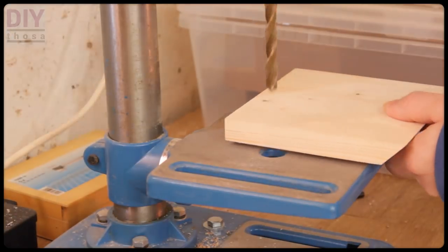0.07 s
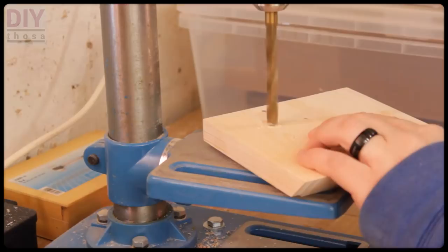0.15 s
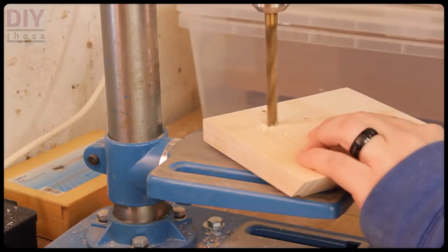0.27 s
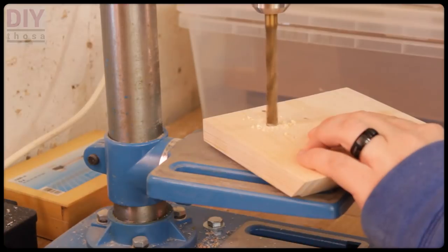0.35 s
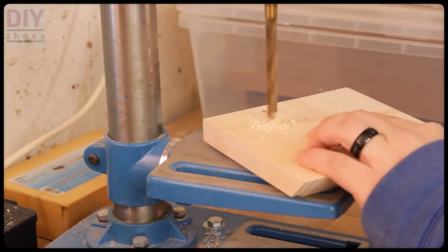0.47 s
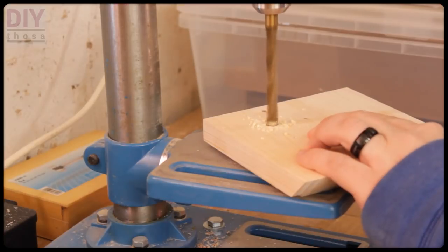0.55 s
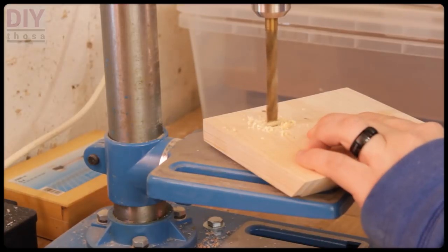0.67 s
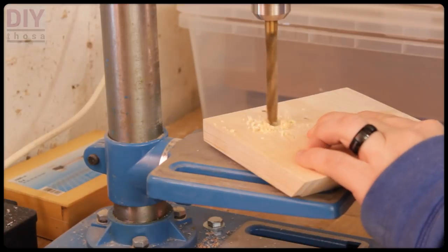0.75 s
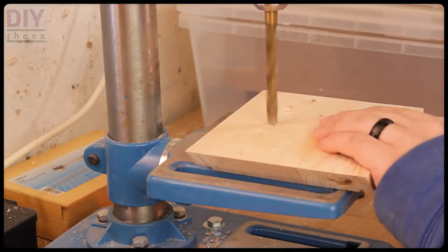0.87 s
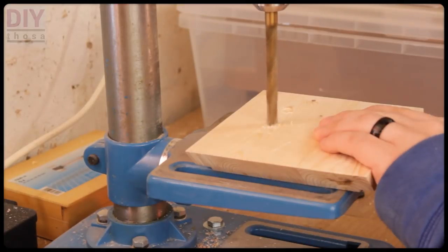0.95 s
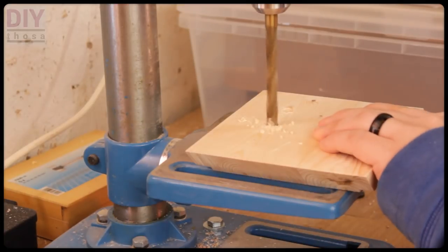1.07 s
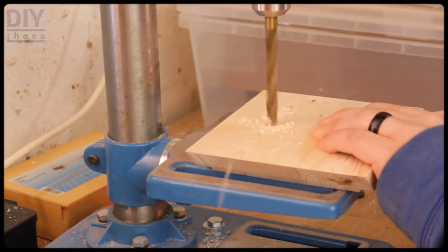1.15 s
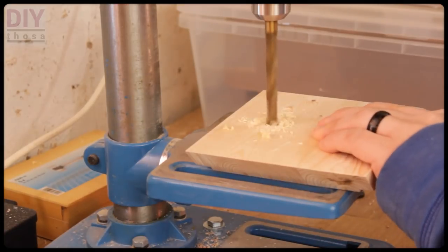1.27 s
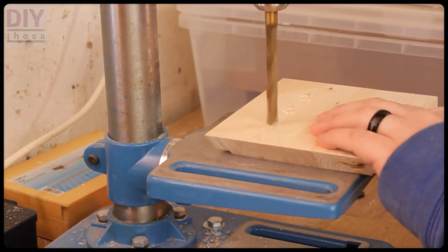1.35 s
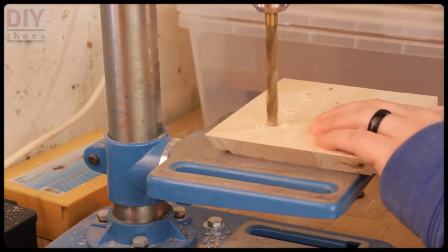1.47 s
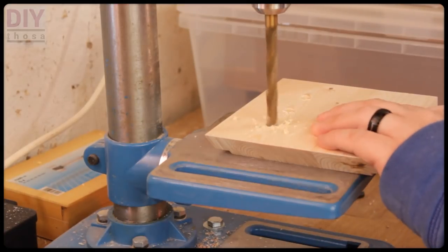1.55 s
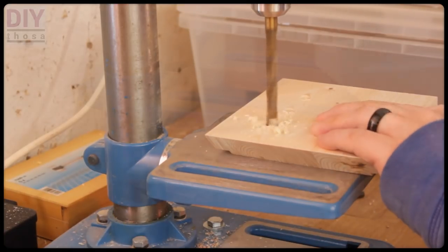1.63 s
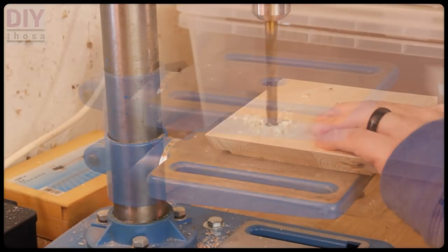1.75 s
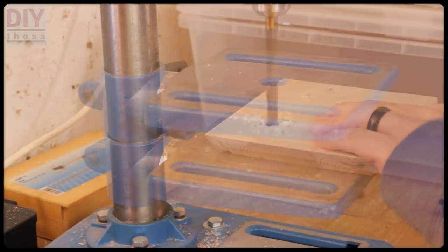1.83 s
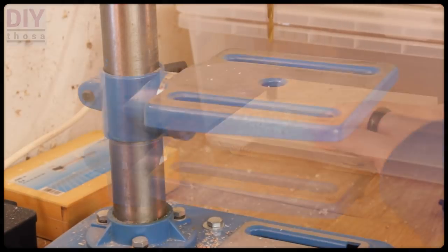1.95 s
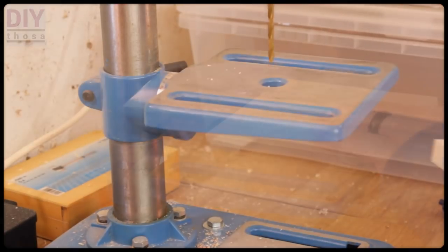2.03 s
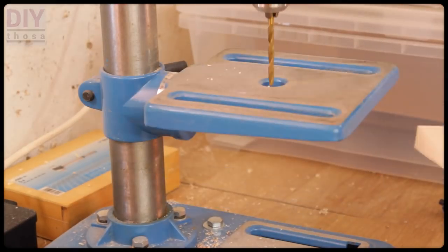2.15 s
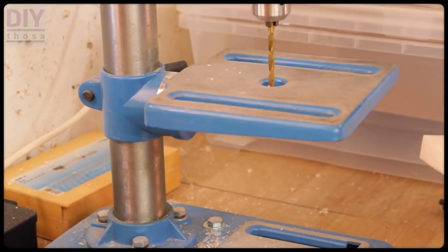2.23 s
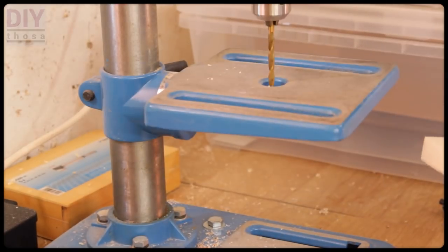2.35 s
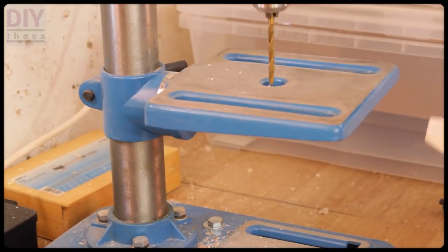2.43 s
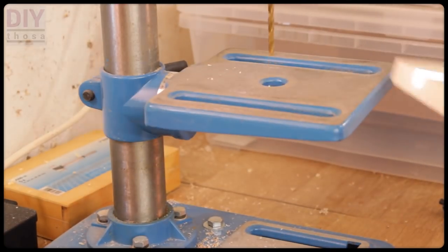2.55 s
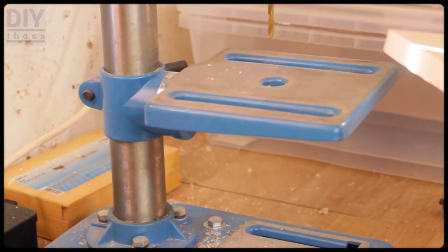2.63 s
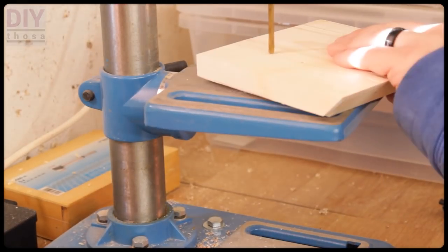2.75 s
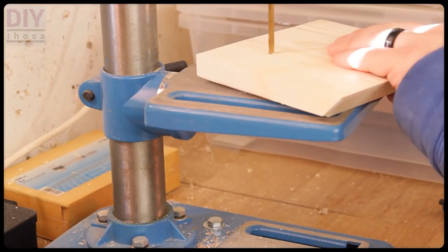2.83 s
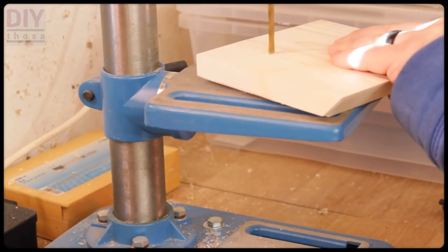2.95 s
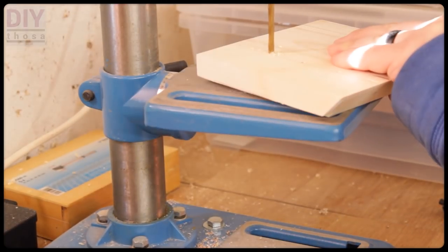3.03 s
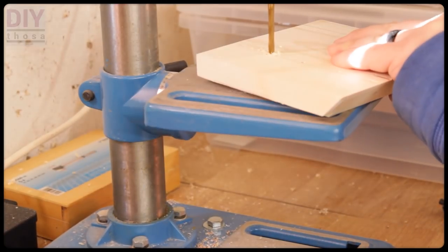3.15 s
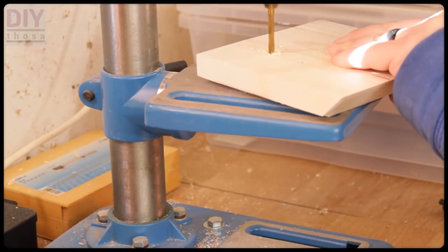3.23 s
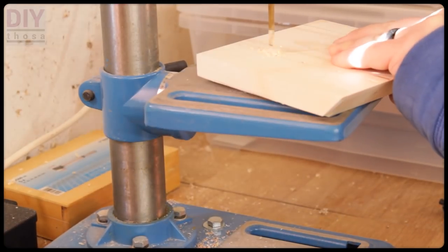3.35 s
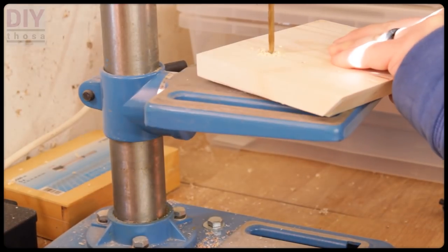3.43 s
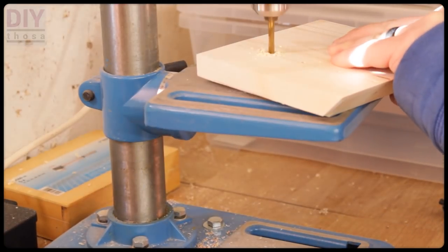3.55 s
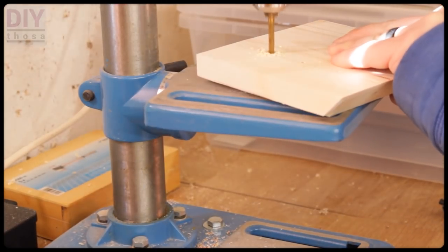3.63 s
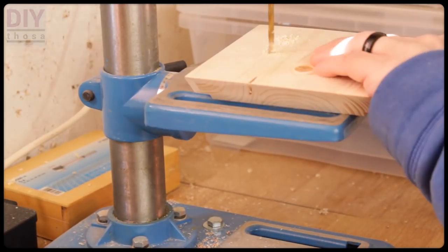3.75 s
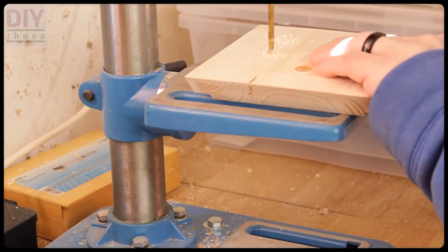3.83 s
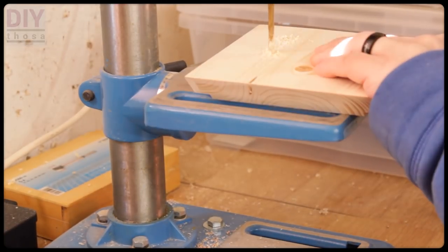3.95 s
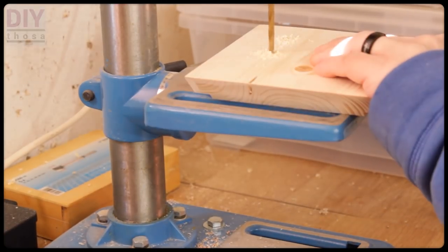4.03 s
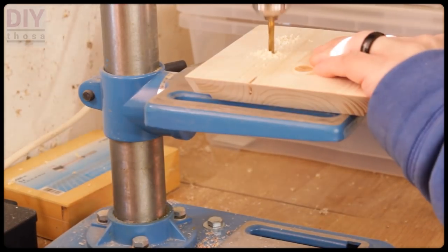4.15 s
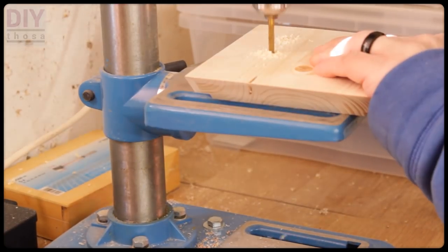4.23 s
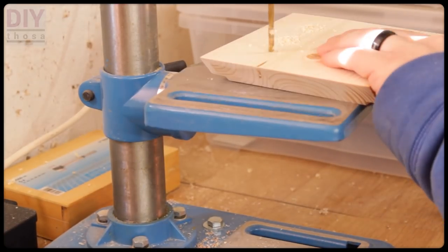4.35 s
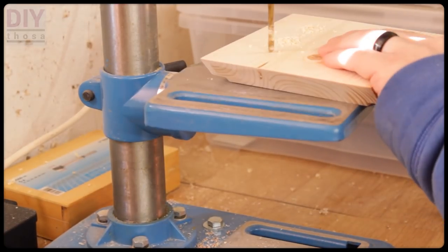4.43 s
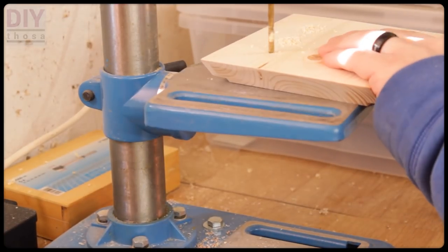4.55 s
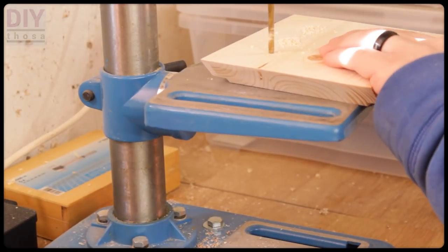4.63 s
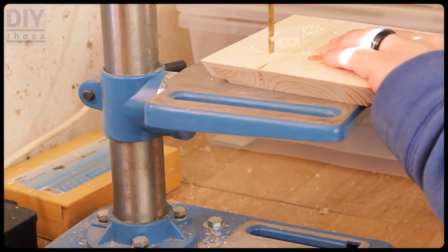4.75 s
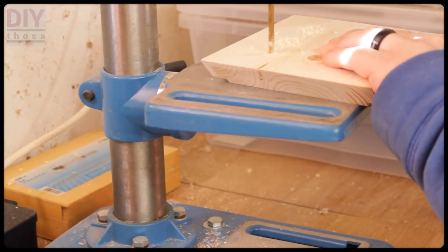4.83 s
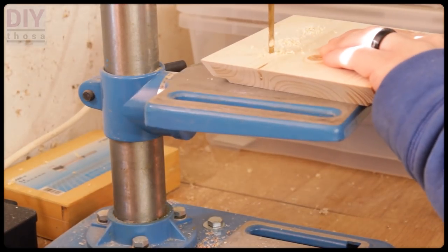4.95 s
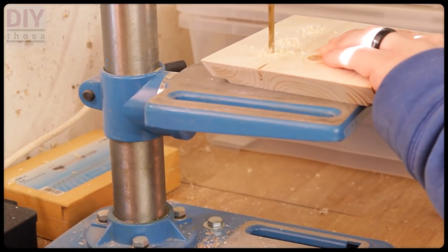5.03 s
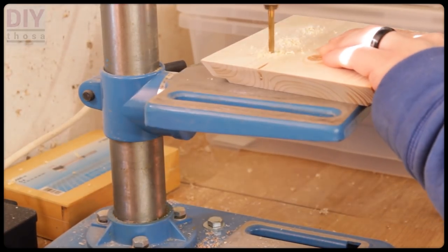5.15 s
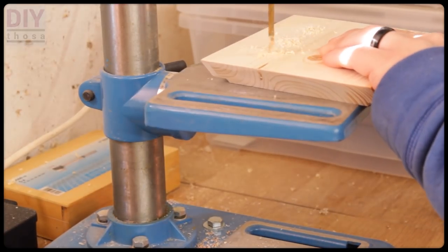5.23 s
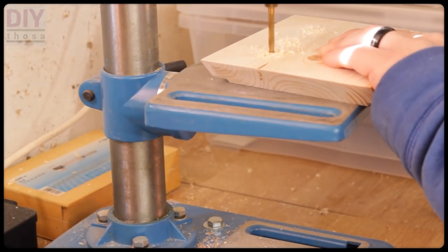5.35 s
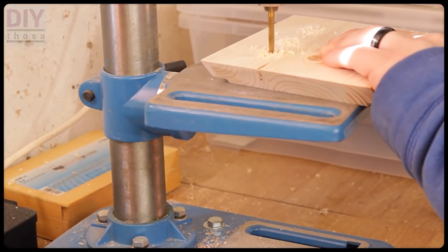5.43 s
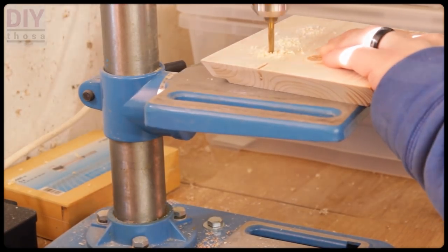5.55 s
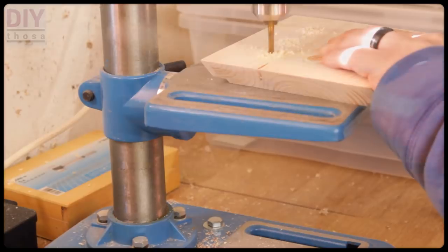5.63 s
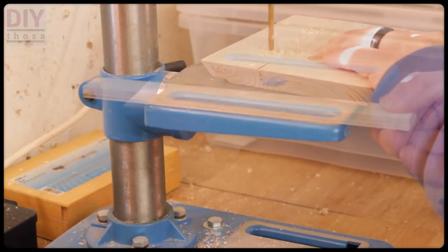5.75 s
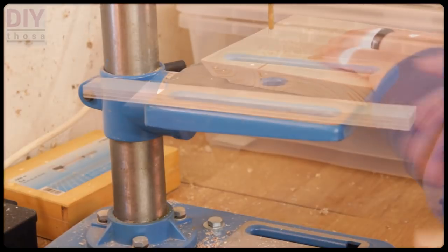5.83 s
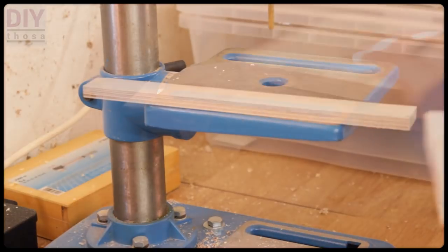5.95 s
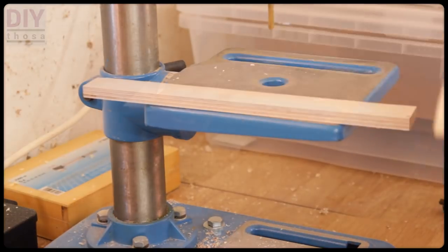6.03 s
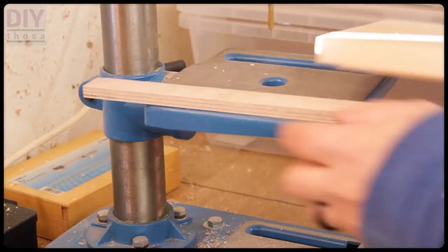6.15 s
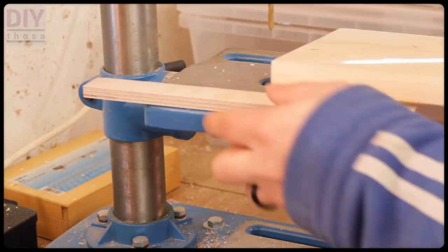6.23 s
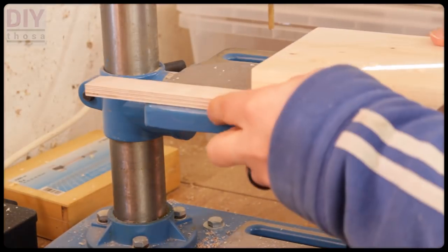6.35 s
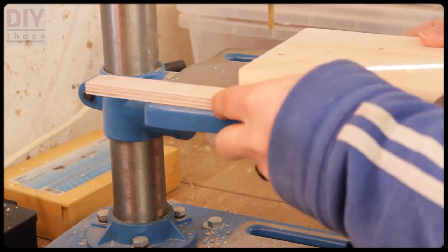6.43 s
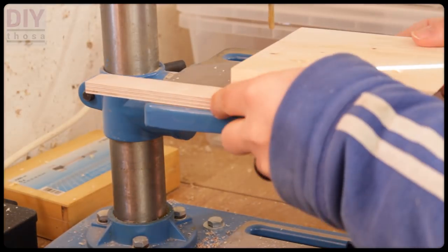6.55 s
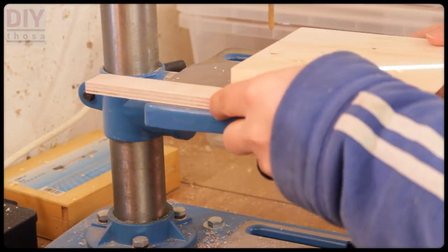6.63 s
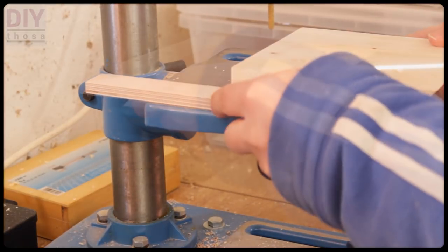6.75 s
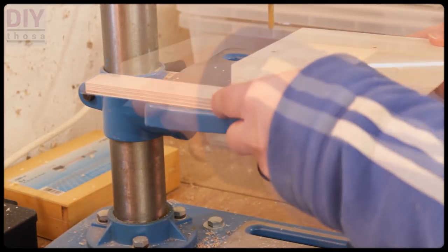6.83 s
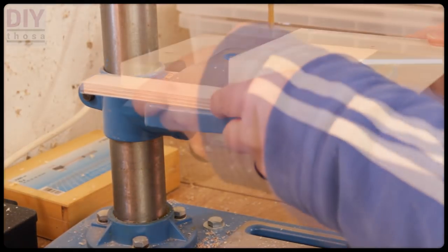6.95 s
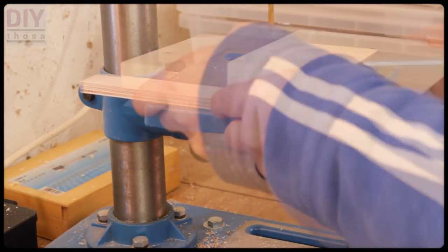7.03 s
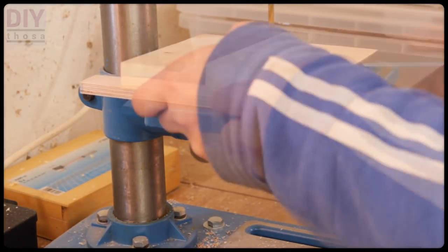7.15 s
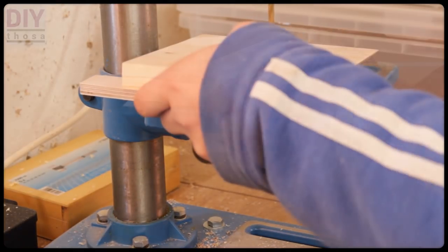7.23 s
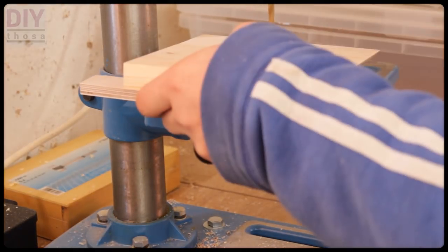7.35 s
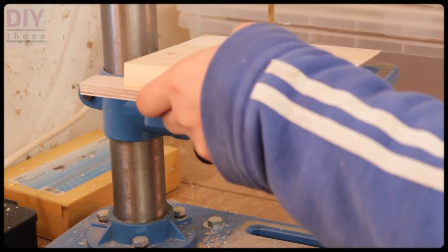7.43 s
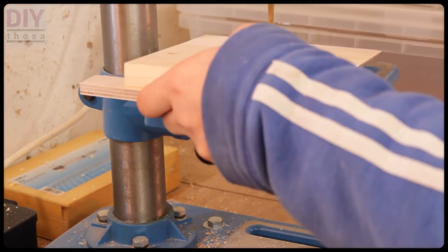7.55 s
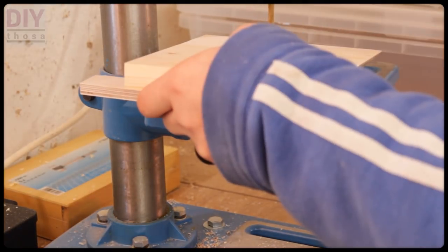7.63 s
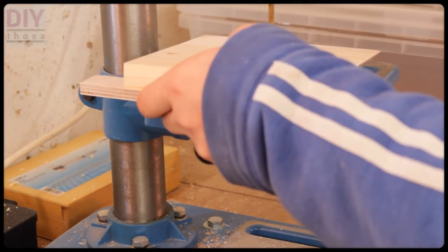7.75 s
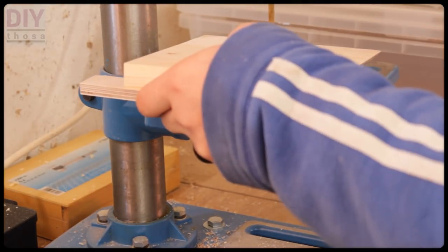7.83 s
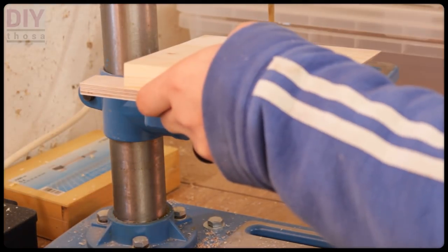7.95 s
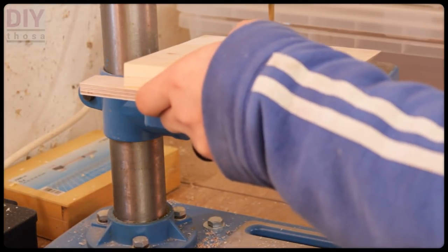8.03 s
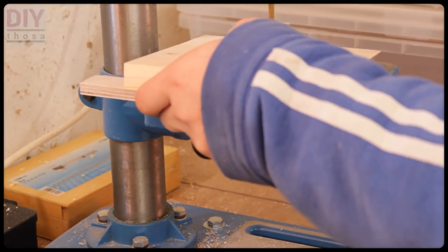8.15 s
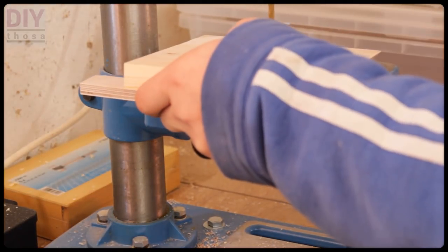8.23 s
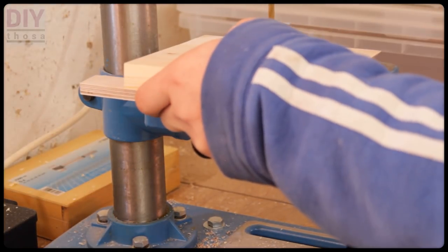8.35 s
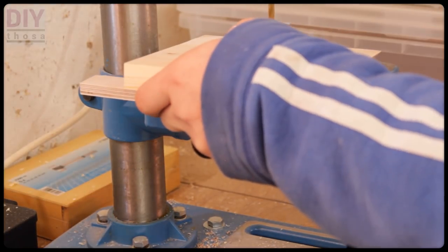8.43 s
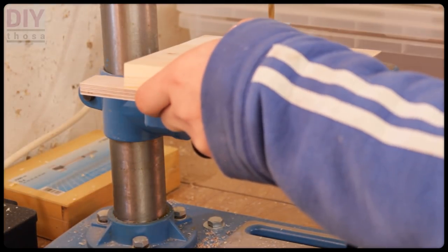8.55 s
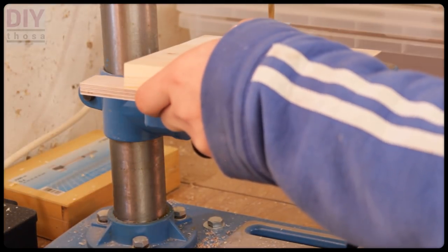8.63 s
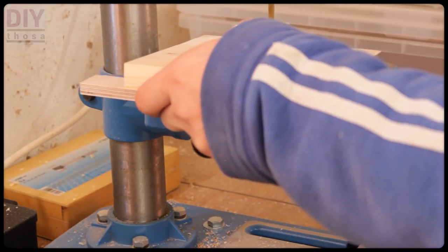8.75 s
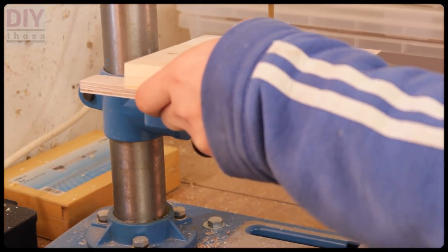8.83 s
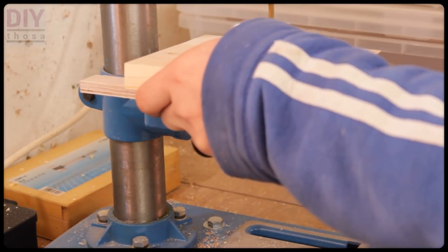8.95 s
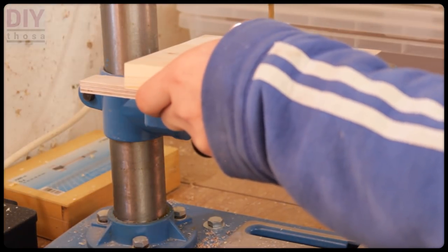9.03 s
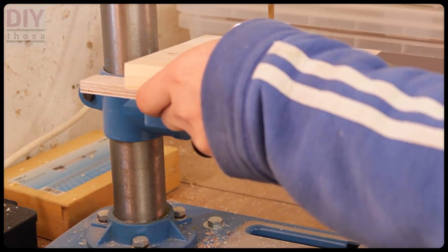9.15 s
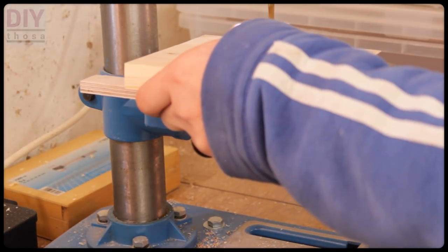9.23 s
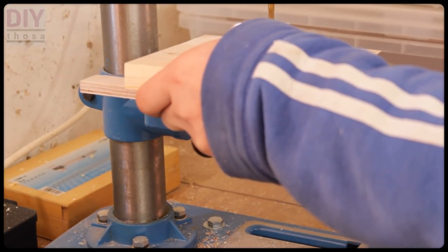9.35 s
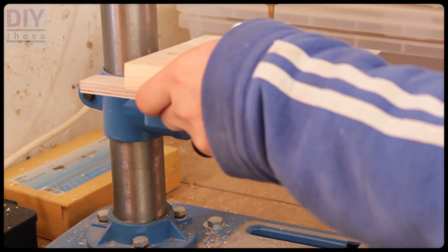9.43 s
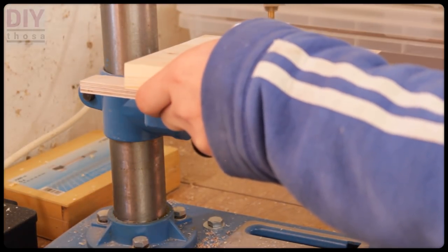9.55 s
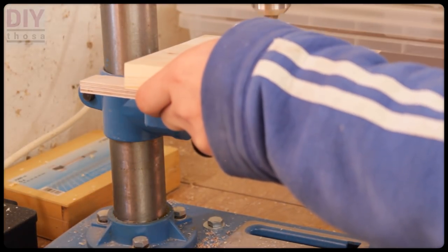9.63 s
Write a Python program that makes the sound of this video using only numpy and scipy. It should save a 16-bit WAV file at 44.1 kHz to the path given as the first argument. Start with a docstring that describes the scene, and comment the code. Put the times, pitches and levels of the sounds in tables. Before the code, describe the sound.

A bench drill press runs close by, its whine under gritty pushes of the bit and sprays of wood chips. A brief pause brings a sliding board and hollow wooden knocks, then further short holes. The final part is a long slow bore: steady hum, metallic chatter that fades as the wood grips, deepening rasp, short squeaks and sharp splinter cracks. Short, dense room reflections, quiet background.

```python
"""Drill press in a small workshop

Close by, a bench drill press bores plywood: fibre clicks, coloured by frame and table, make cutting and chips.
Quick holes come under a motor whine of sine tones; in a pause a board slides and knocks on the iron table.
After more quick holes the motor hums, the spindle rattles and the bit sinks slowly into a thick block,
snapping off chips. Noise makes the scrapes and squeaks; the walls answer briefly over a quiet floor."""
import sys
import numpy as np
from scipy import signal
from scipy.fft import rfft, irfft
from scipy.io import wavfile
from scipy.ndimage import uniform_filter1d

SR = 44100
rng = np.random.default_rng(int(sys.argv[2]) if len(sys.argv) > 2 else 0)


def unload_wav(signal):
    """Save mono or channel-first audio to the path in sys.argv[1] as 16-bit WAV at rate SR, clipped to [-1, 1]."""
    wavfile.write(
        sys.argv[1],
        SR,
        np.round(np.clip(np.atleast_2d(signal).T, -1, 1) * 32767).astype(np.int16),
    )


N = 426888
T = np.arange(N) / SR

# Levels are relative: sources are trimmed again where they are mixed.
# Quiet of the shop: (frequency [Hz], density [dB per Hz])
FLOOR_SPECTRUM = [(30, -15.5), (250, 8.5), (700, 13.5), (2000, -3), (15000, -6)]
# Short low clicks: (time [s], level [dB])
LOW_CLICKS = [(0.217, -39), (0.937, -49), (3.82, -44.5), (7.018, -40)]

# Board slid over the table: (time [s], length [s], level [dB])
BOARD_SLIDES = [(1.885, 0.39, -57), (1.925, 0.027, -46), (2.435, 0.26, -58.5)]
# Board knocks on the table: (time [s], tap level [dB], hollow thud level [dB])
BOARD_KNOCKS = [(0.106, -56, -60), (1.936, -31, -44.5), (1.966, -53, -49), (1.987, -45, -60),
                (2.044, -48.5, -65), (2.158, -44.5, -66), (2.182, -38.5, -57), (2.261, -39, -38),
                (2.538, -44, -46.5), (2.584, -44.5, -49), (2.608, -46.5, -59), (2.666, -45.5, -64),
                (2.693, -55, -52), (2.72, -42, -60)]
# Modes of the board on the table: (frequency [Hz], level [dB], 60 dB decay time [s])
BOARD_MODES = [(249, -5, 0.11), (373, -10, 0.14), (486, 7.5, 0.033), (607, 4.5, 0.038), (783, 4.5, 0.07),
               (1086, 3, 0.045), (1320, -6, 0.13), (1744, 0, 0.076)]
# Strongest resonance of the sliding board: (frequency [Hz], width [Hz], level [dB])
SLIDE_RESONANCE = [(1810, 97, 5.5)]
# Spectra of edge taps, sliding and sawdust crumbs: (frequency [Hz], density [dB per Hz])
TAP_SPECTRUM = [(200, -34), (600, 1), (1700, 16), (3000, 4.5), (6800, 8), (8800, -2), (11500, 5),
                (15500, -21)]
SLIDE_SPECTRUM = [(40, -59), (100, -28.5), (238, -15.5), (540, -11), (770, -5.5), (1050, -8), (1830, -7.5),
                  (2300, -13.5), (3300, -21), (7000, -28), (11800, -32), (16000, -41)]
CRUMB_SPECTRUM = [(1500, -14), (7000, 2), (15500, -6)]

# Largest splinters snap off: (time [s], level [dB], brightness [dB per octave])
SPLINTER_SNAPS = [(0.162, -40, -3), (0.195, -52, 3), (0.937, -40, 0), (6.263, -39, 0), (6.312, -41, -1),
                  (7.065, -40, -1), (7.108, -39, -1), (7.131, -32, -1), (7.298, -41, 3), (7.431, -39, 1),
                  (7.473, -36.5, 4), (7.755, -37.5, 1), (7.794, -41, 1), (7.953, -38, 0), (7.99, -39, -1),
                  (8.07, -34.5, 0), (8.107, -40, -1), (8.297, -37, 0), (8.711, -37, 4), (8.931, -37, -3),
                  (9.212, -36, -6), (9.234, -34, 0), (9.382, -37.5, 3), (9.4995, -35.5, 1),
                  (9.585, -38, -1)]
# Spectrum of snapping and cracking chips: (frequency [Hz], density [dB per Hz])
SPLINTER_SPECTRUM = [(600, -8.5), (2000, 10.5), (3500, 3), (4800, 4), (6200, 4.5), (8500, 3.5),
                     (10500, 3.5), (13000, 1), (15500, -5)]
# Bit scrapes the wall of a quick hole: (time [s], length [s], start [Hz], end [Hz], level [dB])
WALL_SCRAPES = [(3.1, 0.09, 2050, 2400, -53), (3.625, 0.065, 2400, 2650, -46.5),
                (4.225, 0.09, 3000, 2000, -52)]
# A lip sticks deep in the slow hole and squeaks: (time [s], level [dB])
LIP_SQUEAKS = [(8.26, -47), (8.428, -38.5), (8.448, -45), (8.484, -44), (8.619, -44)]

# High whine off the motor housing: (frequency [Hz], thick bit level [dB], thin bit level [dB])
HOUSING_WHINE = [(2499, -52.8, -59), (2853, -72, -66), (2999, -62.5, -72), (3192, -63.5, -71),
                 (3467, -72, -67), (3714, -65, -66)]
# Flutter of that whine: one value [dB] for the thick bit, one for the thin
HOUSING_FLUTTER_DB = [2.2, 5]
# Pressed board radiates the motor's low tone: (time [s], length [s], level [dB])
PRESSED_DRONES = [(0.46, 0.14, -57.5), (1.37, 0.081, -57.5), (2.734, 0.18, -56), (3.33, 0.13, -60.5),
                  (3.63, 0.18, -65.5), (3.96, 0.15, -59), (4.37, 0.338, -58), (4.9, 0.12, -60),
                  (5.24, 0.17, -60.5), (5.63, 0.25, -61)]

# Resonances and notches of frame and table in each set-up: (frequency [Hz], width [Hz], level [dB])
FRAME_BODY = [(203.4, 6.7, 25), (477, 90, 8.5), (1064, 117, 12.5), (1383, 25, -52), (1428, 13, 14),
              (1534, 81, 5.5), (1740, 150, -4), (2120, 27, 8), (2460, 40, 6.5), (2890, 29, 9),
              (3633, 71, 9.5), (5240, 740, 4), (7000, 890, 11.5), (10740, 470, 4), (13400, 430, 3.5)]
TABLE_BODY = [(238, 63, 12), (531, 20, 9.5), (758, 33, 9.5), (779, 19, 8), (2600, 200, 6), (3500, 380, 10),
              (6280, 850, 10), (7660, 250, 4), (12650, 1300, 6.5)]
# Bit turns lightly in the board:
# (time [s], length [s], cutting [dB], grinding [dB], flying chips [dB], motor whine [dB against full])
LIGHT_RUNS = [(0.0, 0.188, -50, -59, -62, -14), (0.213, 1.648, -46, -52.5, -51, 1),
              (2.734, 1.414, -46.5, -58, -51.5, 2), (4.15, 0.132, -49.5, -62, -56, -4.5),
              (4.28, 1.55, -47.5, -58.5, -51.5, 2)]
# Hand pushes the bit down: (time [s], length [s], cutting level [dB], grinding level [dB])
HAND_PUSHES = [(0.222, 0.033, -40, -68), (0.32, 0.15, -58, -49.5), (0.44, 0.21, -45.5, -70),
               (0.575, 0.06, -43, -50), (0.82, 0.056, -44, -62), (0.868, 0.029, -39, -50),
               (0.938, 0.073, -41.5, -71), (1.345, 0.065, -43, -71), (1.44, 0.065, -43, -67),
               (1.63, 0.1, -51, -50), (1.864, 0.035, -39.5, -57), (2.733, 0.2, -45, -61),
               (2.815, 0.25, -43.5, -53), (3.335, 0.072, -40.5, -56.5), (3.46, 0.073, -43, -55),
               (3.622, 0.0802, -42.5, -60), (3.695, 0.078, -42.5, -52), (3.955, 0.064, -43, -52),
               (4.07, 0.062, -41, -54), (4.283, 0.049, -43, -54), (4.368, 0.41, -43.5, -57.5),
               (4.885, 0.14, -43.5, -65), (5.035, 0.019, -40.5, -52.5), (5.228, 0.046, -41, -58),
               (5.275, 0.2, -40.5, -54), (5.57, 0.087, -43, -50), (5.675, 0.17, -41, -54.5)]
# Spectra of cutting, crunch, grinding and chips in the quick holes: (frequency [Hz], density [dB per Hz])
CUT_SPECTRUM = [(160, -36.5), (290, -26.5), (380, -17), (520, -7.5), (800, -16.5), (1400, 4.5), (2100, 3.5),
                (2900, 3), (3800, -3), (5200, -13), (7000, -33), (10000, -17)]
CRUNCH_SPECTRUM = [(600, -20), (1100, -11), (2000, -5.5), (2800, 4.5), (4000, 0), (5800, -8.5),
                   (8000, -14.5), (14000, -38)]
GRIND_SPECTRUM = [(380, -27.5), (560, -6), (760, 1.5), (1100, -3), (1700, -10.5), (3000, -23), (8000, -21)]
CHIP_SPECTRUM = [(1500, -22), (4000, 6), (6000, 2), (8000, -1), (10000, 1), (12500, 5.5), (15500, 6.5)]

# How freely the spindle rattles; the wood steadies it once the bit is in: (time [s], share of treble [0-1])
FREE_RATTLE = [(5.87, .83), (6.95, .88), (7.2, .6), (7.9, .42), (8.4, .14), (9.68, .06)]
# Rings of the steel spindle and chuck: (frequency [Hz], width [Hz], level [dB])
STEEL_RINGS = [(3420, 130, 1), (3620, 220, -2), (4700, 400, -7), (7560, 300, 2), (9400, 700, 0),
               (12050, 250, -3.5)]
# Steel tones of the free-running spindle: (frequency [Hz], level [dB])
FREE_STEEL_TONES = [(3359, 4), (3470, -1), (7391, -17), (12145, -1)]
# Hum of motor, belt and bearings: (frequency [Hz], level [dB])
HUM_TONES = [(250, -1.5), (499.8, 2), (749.6, 6), (999.5, -5.5), (1249.4, 2), (1427, -1.5), (1738, -8.5),
             (1859, -2), (1999, -10.5), (2249, -9), (2611, -11.5)]
# How hard the bit is fed into the slow hole: (time [s], boring level [dB])
SLOW_FEED = [(5.88, -59), (6.25, -52), (6.4, -48.5), (6.9, -41.5), (7.47, -42), (7.48, -47), (7.98, -41),
             (8.48, -51), (8.5, -58), (8.72, -43.5), (8.82, -53), (8.88, -41.5), (9.03, -45.5),
             (9.18, -30.5), (9.23, -51.5), (9.46, -54.5), (9.62, -45)]
# Lips catch in the block: (time [s], length [s], boring level [dB], rasp level [dB])
LIP_CATCHES = [(6.262, 0.1, -53, -65), (7.1, 0.046, -48, -51), (7.41, 0.047, -47.5, -60),
               (7.85, 0.15, -49, -51), (8.1, 0.7, -52, -50.5), (8.61, 0.14, -64, -47),
               (8.845, 0.11, -46.5, -65), (9.66, 0.03, -39.5, -50)]
# Spectra of boring and rasping in the slow hole: (frequency [Hz], density [dB per Hz])
BORE_SPECTRUM = [(70, -37), (130, -20.5), (200, -23), (330, -10.5), (550, -2.5), (800, -2), (1200, 0.5),
                 (1900, -2), (2400, -11), (3200, -17), (6000, -21)]
RASP_SPECTRUM = [(1200, -33), (2100, -1), (2650, 11), (3100, 2.5), (3800, -2), (6000, -37)]

EDGE_HZ = 15850
FADE_IN_S, FADE_IN_DB = 0.094, -50  # the sources fade in from this far down
SLIDE_ATTACK_S, SLIDE_RELEASE_S = 0.022, 0.037
SNAP_MID_HZ = 5000  # brightness tilts the spectrum about this pitch
SCRAPE_WIDTH_HZ = 300
SQUEAK_S, SQUEAK_HZ, SQUEAK_WIDTH_HZ = 0.0063, 2660, 110
SQUEAK_ATTACK_S, SQUEAK_RELEASE_S = 0.0013, 0.0041
BIT_CHANGE_S = 2.4  # the whine is that of the thick bit before, the thin bit after
DRONE_HZ, OCTAVE_DB = 500.2, 1.5  # low tone, and its octave against it
DRONE_LIGHT_DB, DRONE_RISE_S, DRONE_FALL_S = -64, 0.0035, 0.019  # loose board; swell and fade
WHINE_THROB = 0.073  # each lip that bites makes the high tones throb
SING_DB, SING_FULL_CUT_DB, SING_FLUTTER_DB = -47.5, -39, 2.5
SING_BEND_HZ, SING_WOBBLE_HZ = 20, 34.9  # at a full cut
SPINDLE_HZ = 26.2  # turns per second
RUN_ATTACK_S, RUN_RELEASE_S = 0.002, 0.005
PUSH_ATTACK_S, PUSH_RELEASE_S = 0.0014, 0.006
CHIPS_PER_CUT_DB = -14.5  # extra chips that a push throws
SPINDLE_LAG_S = 0.003
SWISH_HZ, SWISH_SWING_HZ, SWISH_WIDTH_HZ, SWISH_LAG_S = 7000, 560, 380, 0.008
SLOW_START_S, BREAK_THROUGH_S = 5.862, 9.195
USUAL_FEED_DB, FEED_GIVE = -48.5, 0.54  # FEED_GIVE: dB of grinding per dB of feed
BORE_START_DB, BORE_DEEP_DB, BORE_RISE_S = -5, -1.16, 1.9  # grinding against feed grows with depth
RASP_START_DB, RASP_DEEP_DB, RASP_RISE_S = -102, -53, 1.9  # the lips rasp more as the hole deepens
RATTLE_START_DB, RATTLE_FULL_DB, RATTLE_END_DB, RATTLE_RISE_S = -56.5, -47.5, -50, 0.88
STEEL_TONES_DB = -15
HUM_DB, HUM_PER_FEED = -57.5, 0.5  # hum at the usual feed; dB per dB of feed
HUM_DAMP_DB_PER_S = 1.1  # the wood damps the hum as the bit sinks
HUM_FLUTTER_DB, LOAD_FLUTTER_DB = -0.5, 6.5  # the hum wavers more once the wood grips the bit
HUM_GROWL = 0.25  # exponent: how far each bite shakes the hum in the wood's grip
HUM_DROP_DB, HUM_HIGH_DROP_DB, HUM_BACK_S = -8, -7, 0.42  # bit through: highs come back over this time


def amp(db):
    """Decibels to gain."""
    return 10 ** (np.asarray(db) / 20)


def evened(x):
    """Scales to rms 1."""
    return x / np.sqrt(np.mean(x ** 2) + 1e-20)


def add(mix, s, sound):
    """Mixes a sound in at time s."""
    part = mix[max(round(s * SR), 0):][:len(sound)]
    part += sound[:len(part)]


def gains(rows, attack, release):
    """Each row (time, length, levels..) swells, holds and dies away; one gain curve per level column."""
    power = np.zeros((len(rows[0]) - 2, N))
    for s, length, *levels in rows:
        t = T[T < length + 10 * release]
        swell = (1 - np.exp(-t / attack)) ** 2
        shape = swell * np.exp(-np.maximum(t - length, 0) / release)
        for curve, db in zip(power, levels):
            add(curve, s, (amp(db) * shape) ** 2)
    return np.sqrt(power)


def wander(hz):
    """Slow chance of rms 1: noise under a Gaussian low-pass of the given rate."""
    f = np.fft.rfftfreq(N, 1 / SR)
    return evened(irfft(rfft(rng.standard_normal(N)) * np.exp(-(f / hz) ** 2), N))


def colour(x, spectrum, body=()):
    """Causal minimum-phase filter: a smooth spectrum with the resonances of a body; rms 1."""
    size = 8192
    f = np.fft.rfftfreq(size, 1 / SR)
    hz, db = np.transpose(spectrum)
    low_cut = 40 * np.log10(np.clip(f / hz[0], 0.05, 1))  # 12 dB per octave below the first point
    resonances = sum(d / (1 + (2 * (f - h) / w) ** 2) for h, w, d in body)
    db = np.interp(np.log(f + 1), np.log(hz), db) + low_cut + resonances
    log_gain = np.log(amp(np.r_[db, db[-2:0:-1]]))
    # the Hilbert transform of the log gain gives the minimum phase
    taps = np.fft.ifft(np.exp(signal.hilbert(log_gain).conj())).real[:size // 2]
    return evened(signal.oaconvolve(x, taps)[:len(x)])


def bites(hz, rise, decay, uneven_db, depth, jitter=0.11, lag=0):
    """Strength of a blow that returns every turn or half turn, in uneven strength and time; rms 1."""
    turns = hz * (T - lag) + 1 + jitter * wander(36.0)
    strength = amp(uneven_db * rng.uniform(-1.96, 1, size=1024))[turns.astype(int)]
    age = (turns % 1) / hz
    blows = evened(strength * (1 - np.exp(-age / rise)) * np.exp(-age / decay))
    depth = np.clip(depth, 0, 1)
    return evened(1 - depth + depth * blows)


def fibres(per_s, spread_db):
    """Wood fibres break as clicks: many small, a few large."""
    size = amp(spread_db * np.minimum(rng.exponential(1, N), 4))
    return evened(size * rng.choice([-1, 1], N) * (rng.random(N) < per_s / SR))


def tones(lines, waver, flutter_db):
    """Machine tones on one slightly unsteady shaft speed; each flutters in strength, high ones most."""
    clock = T + waver * np.cumsum(wander(6.37)) / SR
    out = np.zeros(N)
    for hz, db in lines:
        knots = np.cumsum(rng.exponential(0.04, 400))
        sway_db = np.sqrt(hz / 1000) * np.interp(T, knots, rng.uniform(-1.75, 1, len(knots)))
        wave = np.sin(2 * np.pi * (hz * clock + rng.random()))
        out += amp(db) * evened(amp(flutter_db * sway_db) * wave)
    return out


def speckle(x, depth_db):
    """Each chip has a pitch of its own: the treble flickers in short, broad patches."""
    hz, t, z = signal.stft(x, SR, nperseg=256)
    patches = uniform_filter1d(rng.standard_normal(z.shape), size=17, axis=0)
    patches = evened(uniform_filter1d(patches, size=4, axis=1))
    z = z * amp(depth_db * np.sqrt(hz / hz[-1])[:, None] * np.tanh(patches))
    return evened(signal.istft(z, SR, nperseg=256)[1][:N])


def burst(rise, decay, spectrum, body=()):
    """A short crack of many tiny contacts, of rms about 1 at its top."""
    t = T[:6000]
    shape = (1 - np.exp(-t / rise)) * np.exp(-t / decay)
    return colour(rng.standard_normal(len(t)) * shape, spectrum, body) / evened(shape).max()


def shop_quiet():
    """The quiet of the shop: steady coloured noise."""
    return amp(-73.5) * colour(rng.standard_normal(N), FLOOR_SPECTRUM)


def workshop(x):
    """Close walls and the bench answer with a short, dense tail of random echoes."""
    t = T[:SR // 3]
    echoes = rng.standard_normal(len(t)) * (rng.random(len(t)) < 2500 / SR) * (t > 0.002)
    tail = echoes * amp(-60 * t / 0.11)  # falls 60 dB in 0.11 s
    return signal.oaconvolve(x, tail / np.linalg.norm(tail))[:N]


def low_clicks():
    """Low clicks: short pulses with no ring."""
    out, u = np.zeros(N), T[:2000] / 0.0001
    for s, db in LOW_CLICKS:
        add(out, s, amp(db + 19.5) * u * (1 - u / 3) * np.exp(-u))
    return out


def crumbs(slide):
    """Crumbs of sawdust burst under the sliding board, each a tiny puff of noise."""
    puffs = signal.oaconvolve(fibres(130, 1.4) ** 2, np.exp(-T[:600] / 0.00081))[:N]
    crackle = colour(np.sqrt(abs(puffs)) * rng.standard_normal(N), CRUMB_SPECTRUM)
    return amp(-4.0) * slide * speckle(crackle, depth_db=9)


def board(slide):
    """The board scrapes over sawdust on the table, taps on its edges and thuds in its modes."""
    scraping = fibres(5000, 1.7) * amp(2 * wander(33))
    out = amp(3.5) * slide * colour(scraping, SLIDE_SPECTRUM, SLIDE_RESONANCE)
    t = T[:10000]
    for s, tap_db, thud_db in BOARD_KNOCKS:
        ring = np.zeros(len(t))
        for hz, db, t60 in BOARD_MODES:
            struck_hz = hz * rng.uniform(0.93, 1.015)  # each knock shifts the modes a little
            ring += amp(db - 60 * t / t60) * np.sin(2 * np.pi * (struck_hz * t + rng.random()))
        add(out, s, amp(tap_db) * burst(0.00063, 0.003, TAP_SPECTRUM))
        add(out, s, amp(thud_db - 1.5) * ring * (1 - np.exp(-t / 0.0038)))
    return out


def splinters():
    """Larger chips snap off the rim of the hole, thin ones bright and thick ones dull."""
    out = np.zeros(N)
    for s, db, brightness in SPLINTER_SNAPS:
        spectrum = [(hz, level + brightness * np.log2(hz / SNAP_MID_HZ)) for hz, level in SPLINTER_SPECTRUM]
        add(out, s, amp(db) * burst(0.00025, 0.0028, spectrum, TABLE_BODY))
    return out


def stick_slip(length, start_hz, end_hz, width_hz):
    """Steel sticks and slips on wood: a rough resonance that may slide; rms about 1."""
    t = T[T < length + 10 * SQUEAK_RELEASE_S]
    shape = (1 - np.exp(-t / SQUEAK_ATTACK_S)) * np.exp(-np.maximum(t - length, 0) / SQUEAK_RELEASE_S)
    angle = 2 * np.pi * np.cumsum(np.interp(t, [0, length], [start_hz, end_hz])) / SR
    narrow = signal.butter(2, width_hz, fs=SR, output="sos")
    a, b = signal.sosfilt(narrow, rng.standard_normal((2, SR)))[:, -len(t):]
    rough = shape * (a * np.cos(angle) + b * np.sin(angle))
    return evened(rough) * np.sqrt(np.mean(shape ** 2))


def squeaks():
    """The bit rubs the wall of the hole: broad sliding scrapes and short, narrow squeaks."""
    out = np.zeros(N)
    for s, length, start_hz, end_hz, db in WALL_SCRAPES:
        add(out, s, amp(db) * stick_slip(length, start_hz, end_hz, SCRAPE_WIDTH_HZ))
    for s, db in LIP_SQUEAKS:
        add(out, s, amp(db) * stick_slip(SQUEAK_S, SQUEAK_HZ, SQUEAK_HZ, SQUEAK_WIDTH_HZ))
    return out


def singing_bit(cut):
    """The bit sings on the motor's third harmonic; a harder cut makes it louder, sharper, more unsteady."""
    load = np.clip(cut / amp(SING_FULL_CUT_DB), 0, 1)
    hz = 3 * DRONE_HZ + load ** 2 * (SING_BEND_HZ + SING_WOBBLE_HZ * wander(51.7))
    level = amp(SING_DB + SING_FLUTTER_DB * wander(22)) * np.sqrt(load)
    return level * np.sin(2 * np.pi * np.cumsum(hz) / SR)


def whine(running, cut):
    """The pressed board radiates the motor's low tones; high ones come more steadily off the housing."""
    pressed, = gains(PRESSED_DRONES, DRONE_RISE_S, DRONE_FALL_S)
    drone = np.hypot(pressed, amp(DRONE_LIGHT_DB))
    low = drone * tones([(DRONE_HZ, 0), (2 * DRONE_HZ, OCTAVE_DB)], waver=0.00091, flutter_db=1.3)
    high = singing_bit(cut)
    for bit, fitted in enumerate([T < BIT_CHANGE_S, T >= BIT_CHANGE_S]):
        lines = [(hz, db[bit]) for hz, *db in HOUSING_WHINE]
        high = high + fitted * tones(lines, waver=0.0014, flutter_db=HOUSING_FLUTTER_DB[bit])
    lip_phase = 2 * np.pi * (2 * SPINDLE_HZ * T + 0.14 * wander(5.9))
    throb = 1 + np.clip(WHINE_THROB, 0, 1) * np.cos(lip_phase)
    return running * (low + throb * high)


def quick_effort():
    """Gains of cutting, grinding, chips and whine: light running, with every push on top."""
    cut, grind, chips, motor = gains(LIGHT_RUNS, RUN_ATTACK_S, RUN_RELEASE_S)
    push_cut, push_grind = gains(HAND_PUSHES, PUSH_ATTACK_S, PUSH_RELEASE_S)
    all_chips = np.hypot(chips, amp(CHIPS_PER_CUT_DB) * push_cut)
    return np.hypot(cut, push_cut), np.hypot(grind, push_grind), all_chips, motor


def quick_holes(cut, grind, chips):
    """Two lips tear fibres into the ringing frame and throw chips."""
    lips = bites(2 * SPINDLE_HZ, rise=0.002, decay=0.008, uneven_db=5, depth=0.3)
    tearing = colour(fibres(9000, 4.2) * lips, CUT_SPECTRUM, FRAME_BODY)
    crunch = speckle(colour(fibres(5000, 2.7) * lips, CRUNCH_SPECTRUM), depth_db=9.5)
    # a hard feed turns the frame's ring into a broad crunch
    load = 1.03 * np.clip(cut / amp(-35.0), 0, 1) ** 2
    cutting = np.sqrt(abs(1 - load)) * tearing + np.sqrt(load) * crunch
    grinding = colour(fibres(6000, 1.3) * lips, GRIND_SPECTRUM)
    clumps = amp(3.3 * wander(240))  # chips leave in clumps
    spray = colour(fibres(5000, 1.0) * lips * clumps, CHIP_SPECTRUM, FRAME_BODY)
    flying = speckle(spray, depth_db=4.0)
    return amp(-2) * cut * cutting + amp(-4.0) * grind * grinding + amp(2.5) * chips * flying


def spindle():
    """Play in the quill lets steel chatter on steel once a turn, buzzing with the motor; rms 1."""
    buzz = 1 + 0.09 * np.cos(2 * np.pi * HUM_TONES[0][0] * T)
    blows = bites(SPINDLE_HZ, rise=0.006, decay=0.01, uneven_db=2.2, depth=0.92, jitter=0.04,
                  lag=SPINDLE_LAG_S)
    t = T[:2048]
    ring = np.zeros(len(t))
    for hz, width, db in STEEL_RINGS:
        ring += amp(db) * np.sqrt(width) * np.exp(-np.pi * width * t) * np.sin(2 * np.pi * hz * t)
    # small parts radiate no bass; grease dulls the top
    ring = signal.sosfilt(signal.butter(3, [2000, 12400], "band", fs=SR, output="sos"), ring)
    chatter = fibres(3000, 0.54) * buzz * blows
    return speckle(signal.oaconvolve(chatter, ring)[:N], depth_db=8.5)


def swish():
    """The turning flutes hiss in a resonance that rises and falls unevenly once a turn; rms 1."""
    swing = np.cos(2 * np.pi * SPINDLE_HZ * (T - SWISH_LAG_S) + wander(28) / 2)
    angle = 2 * np.pi * np.cumsum(SWISH_HZ - SWISH_SWING_HZ * swing) / SR
    narrow = signal.butter(2, SWISH_WIDTH_HZ, fs=SR, output="sos")
    a, b = signal.sosfilt(narrow, rng.standard_normal((2, N)))
    return evened(amp(2 * wander(29)) * (a * np.cos(angle) + b * np.sin(angle)))


def motor_hum(free, lips):
    """Hum of the turning machine: it wavers and growls under load, then drops once the bit is through."""
    since_through = T - BREAK_THROUGH_S
    through = np.clip(since_through / PUSH_RELEASE_S, 0, 1)
    slack = through * np.clip(1 - (since_through / HUM_BACK_S) ** 2, 0, 1)
    flutter_db = HUM_FLUTTER_DB + LOAD_FLUTTER_DB * (1 - free)
    hum = amp(HUM_DROP_DB * through) * tones(HUM_TONES[:2], waver=0.0005, flutter_db=flutter_db)
    hum += amp(HUM_HIGH_DROP_DB * slack) * tones(HUM_TONES[2:], waver=0.00068, flutter_db=flutter_db)
    return hum * lips ** (HUM_GROWL * (1 - free))


def slow_effort():
    """Gains of boring, rasp, treble and hum: hum follows the feed, rasp and grinding grow with depth."""
    age = T - SLOW_START_S
    feed_db = np.interp(T, *np.transpose(SLOW_FEED))
    extra_feed_db = feed_db - USUAL_FEED_DB
    catch_bore, catch_rasp = gains(LIP_CATCHES, PUSH_ATTACK_S, PUSH_RELEASE_S)
    depth_db = np.interp(age, [0, BORE_RISE_S], [BORE_START_DB, BORE_DEEP_DB])
    bore = np.hypot(amp(USUAL_FEED_DB + FEED_GIVE * extra_feed_db + depth_db), catch_bore)
    rasp_db = np.interp(age, [0, RASP_RISE_S], [RASP_START_DB, RASP_DEEP_DB])
    rasp = np.hypot(amp(rasp_db), catch_rasp)
    treble = amp(np.interp(age, [0, RATTLE_RISE_S, BREAK_THROUGH_S - SLOW_START_S],
                           [RATTLE_START_DB, RATTLE_FULL_DB, RATTLE_END_DB]))
    motor = amp(HUM_DB + HUM_PER_FEED * extra_feed_db - HUM_DAMP_DB_PER_S * age)
    return np.clip(age / RUN_ATTACK_S, 0, 1) * np.array([bore, rasp, treble, motor])


def slow_hole():
    """The bit grinds deep in the block; each lip cracks off chips and rasps on the wall, over the hum."""
    bore, rasp, treble, motor = slow_effort()
    free = np.clip(np.interp(T, *np.transpose(FREE_RATTLE)), 0, 1)
    lips = bites(2 * SPINDLE_HZ, rise=0.0015, decay=0.004, uneven_db=4, depth=0.5, jitter=0.08, lag=-0.003)
    rubs = bites(2 * SPINDLE_HZ, rise=0.0015, decay=0.004, uneven_db=5, depth=0.7, jitter=0.05, lag=-0.002)
    grinding = colour(fibres(7000, 1.8) * lips ** 0.41, BORE_SPECTRUM, TABLE_BODY)
    rasping = colour(fibres(6000, 1.0) * rubs, RASP_SPECTRUM, TABLE_BODY)
    cracks = fibres(6000, 0.54) * lips * amp(2 * wander(190))
    cracking = speckle(colour(cracks, SPLINTER_SPECTRUM, TABLE_BODY), depth_db=8.5)
    singing = free * amp(STEEL_TONES_DB) * tones(FREE_STEEL_TONES, waver=0.0004, flutter_db=2)
    bright = np.sqrt(1 - free) * cracking + np.sqrt(free / 2) * (spindle() + swish()) + singing
    wood = amp(1.0) * bore * grinding + amp(-5.0) * rasp * rasping
    return wood + amp(-1.0) * treble * bright + amp(1.5) * motor * motor_hum(free, lips)


def scene():
    """All sources, their room, and the quiet of the shop."""
    cut, grind, chips, motor = quick_effort()
    slide, = gains(BOARD_SLIDES, SLIDE_ATTACK_S, SLIDE_RELEASE_S)
    clatter = splinters() + board(slide) + crumbs(slide)
    drilling = quick_holes(cut, grind, chips) + whine(motor, cut) + slow_hole() + squeaks()
    # of the drilling, only the treble reaches the room tail
    treble = signal.sosfilt(signal.butter(4, 3500, "high", fs=SR, output="sos"), drilling)
    room = amp(-5.5) * workshop(clatter + treble)
    fade_in = amp(FADE_IN_DB * np.clip(1 - T / FADE_IN_S, 0, 1))
    return (fade_in * (drilling + clatter + low_clicks() + room) + shop_quiet())[None]


def record(dry):
    """One microphone channel with the recorder's upper band limit."""
    low_pass = signal.firwin(511, EDGE_HZ, window=("kaiser", 9), fs=SR)
    return signal.oaconvolve(dry, low_pass[None], "same")


dry = scene()
out = record(dry)
unload_wav(out)
```